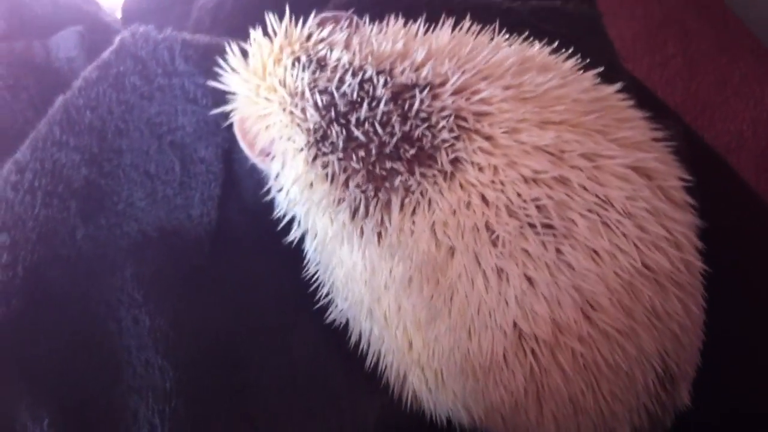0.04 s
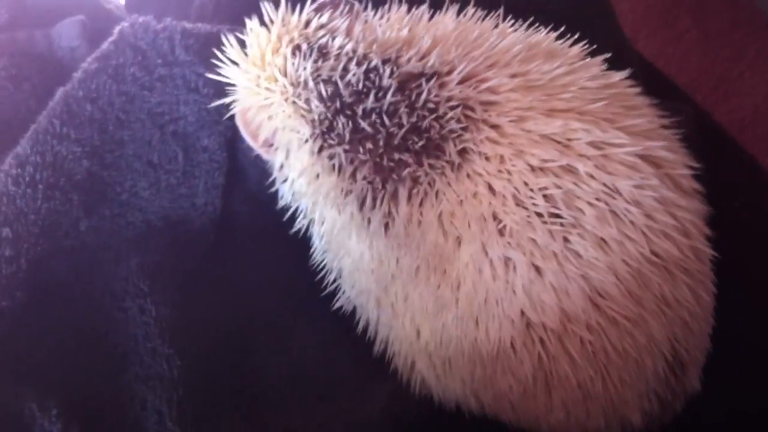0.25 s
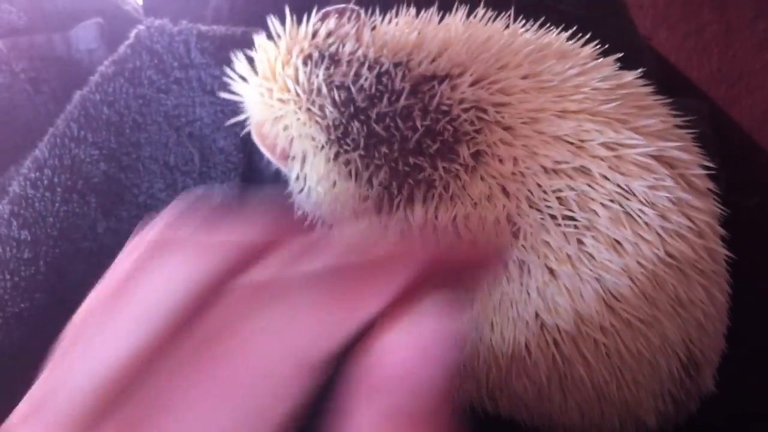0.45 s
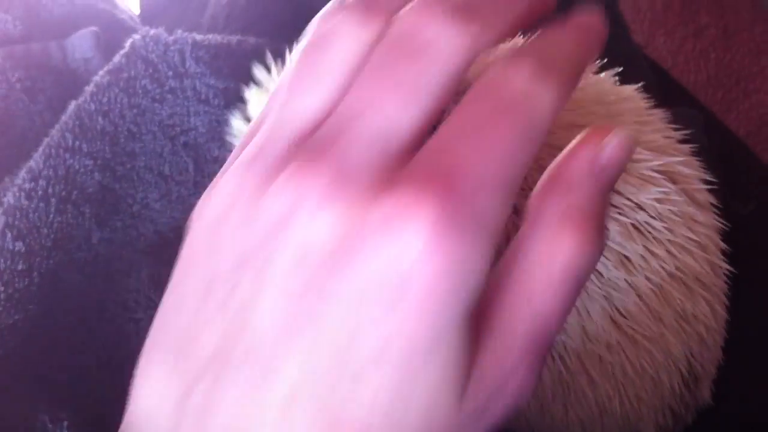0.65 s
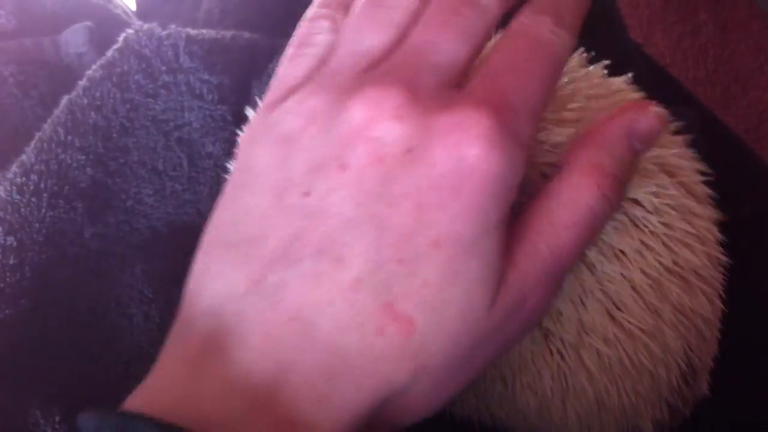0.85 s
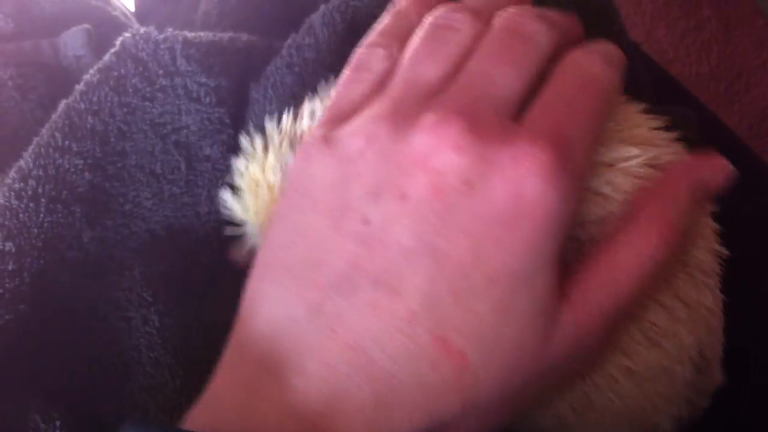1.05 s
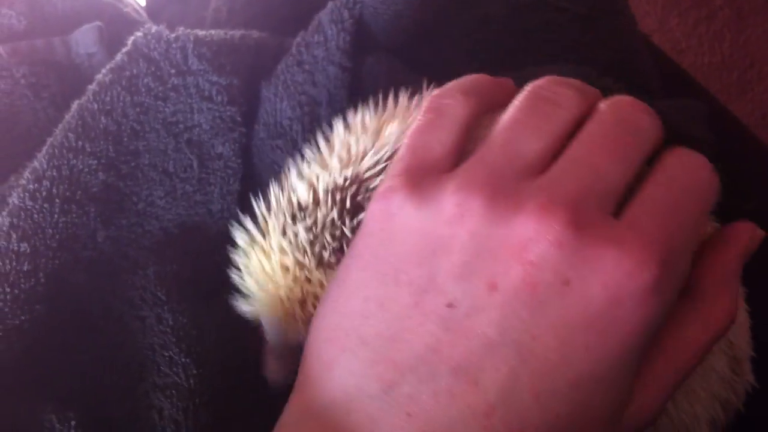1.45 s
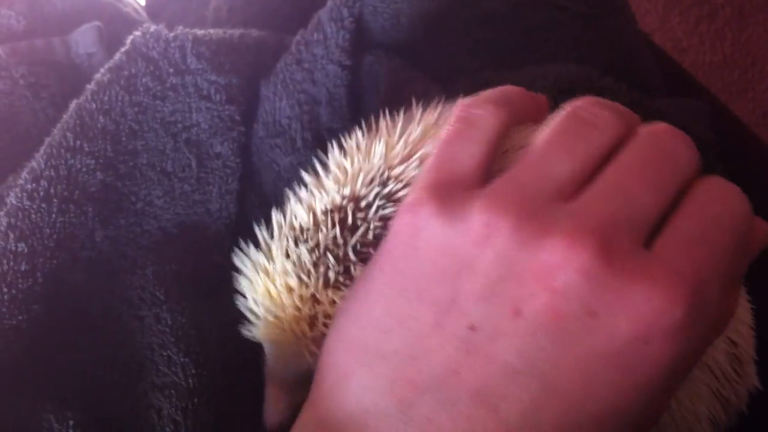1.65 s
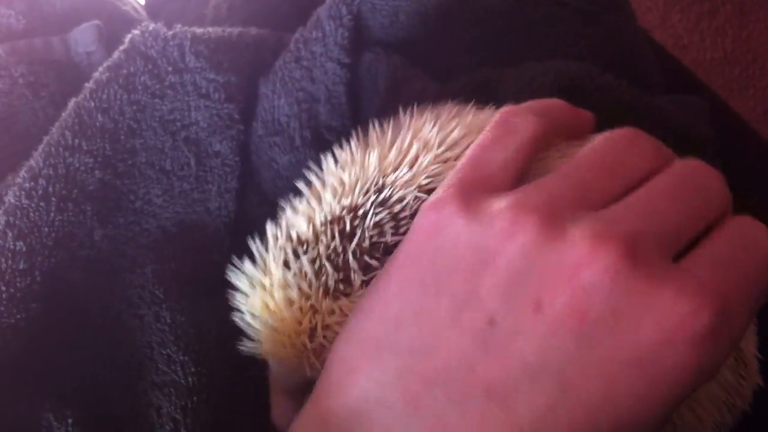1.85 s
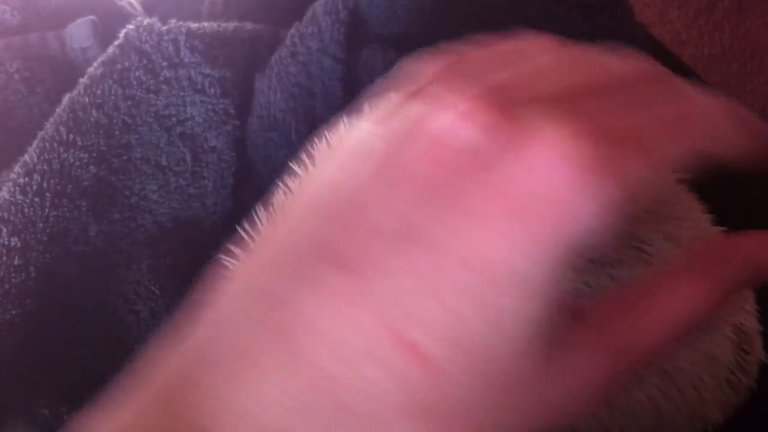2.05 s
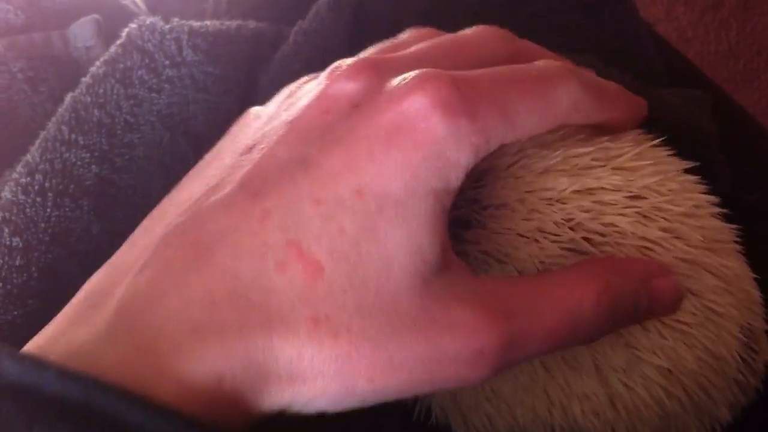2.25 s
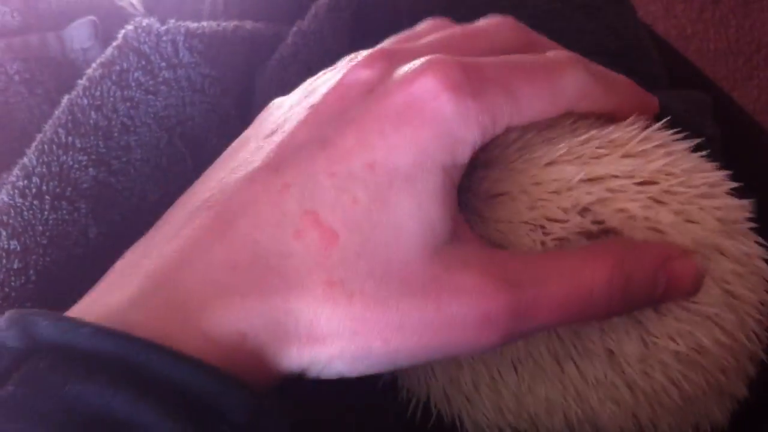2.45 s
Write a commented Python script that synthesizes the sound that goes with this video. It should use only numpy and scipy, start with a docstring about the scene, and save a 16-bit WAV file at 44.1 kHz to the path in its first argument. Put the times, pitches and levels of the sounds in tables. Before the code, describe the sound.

A hand softly strokes a hedgehog on a fleece blanket. First, light taps and a short scrape on the microphone end in one loud, dry knock at 0.25 seconds. Faint brushing over quills and cloth comes in strokes from 0.4 seconds on, with a faint, thin ring near 0.6. Between 1.1 and 2 seconds the hedgehog gives quick, very high sniffs, some whistling. Quiet room hiss and hum continue throughout.

```python
"""First come light taps and a short scrape as a grip slips on a hand-held microphone, then one dry knock.
After that a hand softly strokes a pet hedgehog on a fleece blanket: skin brushes over quills and cloth,
and a faint, thin tone rings briefly. The hedgehog sniffs in quick, very high puffs of air, some with
a thin nose whistle. Behind it all lie the hiss and low hum of a quiet room."""
import sys
import numpy as np
from scipy import signal
from scipy.fft import rfft, irfft
from scipy.io import wavfile
from scipy.ndimage import uniform_filter1d

SR = 44100
rng = np.random.default_rng(int(sys.argv[2]) if len(sys.argv) > 2 else 0)


def unload_audio(sound):
    """Save the sound as a 16-bit wav file, at the path given as the first command line argument."""
    columns = np.transpose(np.atleast_2d(sound))
    # keep every value between -1 and 1, then stretch to whole-number steps
    steps = np.round(np.clip(columns, -1, 1) * 32767)
    wavfile.write(sys.argv[1], SR, steps.astype(np.int16))


N = 110250

# Tone of the room air and microphone hiss: pitch_hz, gain_db
AIR_TONE = [(25, -12.5), (45, -20), (73, -18.5), (100, -9.5), (160, -1.5), (270, 0), (420, -5.5),
            (900, -10.5), (1500, -12), (2500, -14), (6000, -14.5), (9000, -15.5), (11800, -13),
            (15500, -14.5)]
# How the thin ring comes and goes: peak_s, rise_s, fall_s
RING_SWELL = (0.6, .09, 0.089)
# Loudness of the slipping grip: time_s, level_db
SLIP_LEVELS = [(.135, -74), (.172, -63), (.188, -55), (.196, -58.5), (0.208, -57), (0.221, -50),
               (.232, -58.5), (0.235, -35), (0.2457, -38), (0.246, -57), (.27, -63)]
# Tone of the slipping grip: pitch_hz, gain_db
SLIP_TONE = [(60, -32.5), (170, -10), (280, -11.5), (470, 4.5), (750, 2), (1500, 0), (2700, -10.5),
             (5000, -12.5), (9000, -8.5), (10300, -13.5), (12000, -9.5), (15500, -23)]
# Pitches at which the microphone's casing rings: pitch_hz, width_hz, gain_db
CASING_RINGS = [(212, 98, 13.5), (330, 140, 19), (523, 230, 15), (774, 224, 16), (1040, 380, 14.5),
                (1910, 570, 10), (2340, 590, 8), (2750, 500, 5.5), (3960, 360, -4.5), (5830, 1470, -2.5),
                (6750, 700, -8), (8950, 1270, 5), (9960, 1160, -2), (13500, 1000, -12)]
# Taps and knocks on the casing: start_s, push_db, crack_db, thump_hz, thump_db
CASING_KNOCKS = [(0.0272, -39.5, -59.5, 290, -53), (0.068, -61.5, -62, 500, -55),
                 (.1743, -45.5, -47, 720, -67), (.1857, -40, -51, 337, -50),
                 (.1893, -32.5, -31, 1020, -51.5), (0.2218, -33, -22, 540, -49),
                 (0.2371, -30.5, -23, 504, -38), (0.2455, -26, -23, 1505, -45), (0.2469, 0, -22, 334, -42)]
# Tone of a knock's crack: pitch_hz, gain_db
CRACK_TONE = [(300, -16), (3500, -2), (8000, -2), (12000, -1), (14000, -6), (15800, -10)]
# Strokes of the hand: peak_s, rise_s, fall_s, cloth_db, skin_db, tips_db, rasp_hz, rasp_db
HAND_STROKES = [(.445, 0.032, 0.044, -80, -75, -65, 1700, -92),
                (.495, 0.027, 0.03, -78, -72.5, -69, 1850, -70.5),
                (0.563, 0.058, 0.074, -63.5, -69, -69.5, 640, -82),
                (.588, 0.017, 0.016, -98, -85, -66.5, 9000, -66),
                (.72, 0.065, 0.085, -78, -75, -72.5, 8600, -75),
                (.803, 0.015, 0.038, -79, -72.5, -69, 5200, -71),
                (.845, 0.044, 0.048, -69.5, -72.5, -77, 2250, -71.5),
                (.94, 0.073, 0.08, -75, -81, -86, 1750, -85),
                (1.215, 0.039, 0.031, -73.5, -73, -75, 1200, -80),
                (1.275, 0.034, 0.048, -74, -79, -70, 3740, -78),
                (1.4, 0.036, 0.029, -76.5, -80, -84, 1510, -82),
                (1.84, 0.024, 0.043, -79, -72, -65, 3870, -71.5),
                (1.891, 0.048, 0.1, -67.5, -65, -84, 610, -75.5),
                (2.12, .08, 0.058, -76.5, -78, -75.5, 1200, -84),
                (2.5, 0.014, .03, -68, -73, -78, 830, -62.5)]
# Tone of the shifting blanket: pitch_hz, gain_db
CLOTH_TONE = [(45, -50), (80, -28), (130, -14), (220, -0.5), (320, 3.5), (480, -6), (700, -7.5),
              (1100, -18.5), (3000, -21), (15000, -48)]
# Tone of skin rubbing along quills: pitch_hz, gain_db
SKIN_TONE = [(50, -20), (200, -16), (700, -2), (1300, -3), (2000, -3), (3100, -7), (4000, -6.5), (6500, -8),
             (10000, -10.5), (15000, -32.5)]
# Tone of flicked quill tips: pitch_hz, gain_db
TIPS_TONE = [(1000, -9), (3500, -24), (5500, -2.5), (7000, -6.5), (9000, 1), (10500, -5), (12000, 3),
             (15500, -10.5)]
# The hedgehog's sniffs: peak_s, level_db
SNIFF_PUFFS = [(.096, -67), (1.148, -68.5), (1.26, -65), (1.357, -62), (1.564, -62.5), (1.661, -66),
               (1.767, -67), (1.877, -63), (1.99, -69.5)]
# Tone of air in its nostrils: pitch_hz, gain_db
NOSE_TONE = [(4000, -37), (8000, -9), (10300, -12), (11600, 3), (13300, -4), (14500, -7), (15800, -11)]
# Its nose whistles: start_s, length_s, from_hz, to_hz, level_db
NOSE_WHISTLES = [(0.081, 0.017, 11000, 12400, -66), (0.095, 0.019, 13750, 13200, -62.5),
                 (1.562, 0.0088, 12900, 14000, -61), (1.652, 0.011, 11700, 12300, -61.5),
                 (1.673, .009, 11700, 11100, -68.5), (1.756, .009, 11800, 12100, -63),
                 (1.757, .014, 14000, 13500, -66), (1.764, .009, 12700, 11600, -62),
                 (1.781, 0.0066, 11900, 11000, -64)]


def undb(db):
    """Turns decibels into a number to multiply by."""
    return 10 ** (np.asarray(db) / 20)


def unit(x):
    """Scales a sound to an average (rms) level of 1."""
    return x / np.sqrt(np.mean(x ** 2))


def times():
    """Time of each sample in seconds."""
    return np.arange(N) / SR


def freqs():
    """Pitches in Hz at which a filter's gains are given."""
    return np.maximum(np.arange(N + 1) * SR / (2 * N), 1)


def contour(tone):
    """Joins the points of a tone table into a gain for every pitch."""
    hz, db = np.array(tone).T
    return undb(np.interp(np.log(freqs()), np.log(hz), db))


def resonance(hz, width_hz):
    """Gains that let through only a band around one pitch."""
    return 1 / (1 + ((freqs() / hz - hz / freqs()) * hz / width_hz) ** 2)


def through(x, gain):
    """Filters a sound, turning each pitch up or down by its gain."""
    cepstrum = irfft(np.log(gain + 1e-7))
    # Folding this way makes the filter ring after a click, never before it.
    cepstrum[1:N] *= 2
    cepstrum[N + 1:] = 0
    return irfft(rfft(x, 2 * N) * np.exp(rfft(cepstrum)))[:N]


def coloured(x, tone):
    """Shapes a sound with a tone table, at an average level of 1."""
    return unit(through(x, contour(tone)))


def grains(per_s, scatter_db=3):
    """Rubbing as a crowd of tiny clicks of uneven size."""
    clicks = (rng.random(N) < per_s / SR) * rng.choice([-1, 1], N)
    return clicks * undb(scatter_db * np.minimum(rng.exponential(size=N), 4))


def wobble(samples):
    """A random wander; more samples make it slower."""
    return unit(uniform_filter1d(rng.standard_normal(N), size=samples))


def swell(peak_s, rise_s, fall_s):
    """A smooth rise and fall around one moment."""
    t = times() - peak_s
    return np.exp(-(t / np.where(t < 0, rise_s, fall_s)) ** 2)


def quiet_room(air_db=-66.5, hum_hz=121, hum_db=-82):
    """Steady room air and microphone hiss over a faint electrical hum."""
    air = coloured(rng.standard_normal(N), AIR_TONE)
    hum = np.sqrt(2) * np.sin(2 * np.pi * hum_hz * times())
    return undb(air_db) * air + undb(hum_db) * hum


def room_echo(x, level_db=-36, fade_s=0.14, dull_above_hz=1200):
    """A furnished room sends back a faint, dull, short echo."""
    tail = through(rng.standard_normal(N), 1 / np.hypot(1, freqs() / dull_above_hz))
    tail *= np.exp(-np.log(1000) * times() / fade_s)  # 60 dB down after fade_s
    tail /= np.sqrt(np.sum(tail ** 2))
    return undb(level_db) * signal.fftconvolve(x, tail)[:N]


def thin_ring(pitch_hz=5500, level_db=-73, waver_share=0.0042, flutter_db=3):
    """A faint, thin, wavering tone while the hand slides in."""
    wavering_hz = pitch_hz * (1 + waver_share * wobble(samples=700))
    level = undb(level_db + flutter_db * wobble(samples=700)) * swell(*RING_SWELL)
    return level * np.sin(2 * np.pi * np.cumsum(wavering_hz) / SR)


def slipping_grip():
    """Skin sticks and slips on the casing, hardest just before the loud knock."""
    time_s, level_db = np.array(SLIP_LEVELS).T
    level = undb(np.interp(times(), time_s, level_db, left=-np.inf, right=-np.inf))
    return level * coloured(grains(per_s=6000), SLIP_TONE)


def knocks(thump_rise_s=0.0016):
    """Each bump gives a crisp crack, a brief ring of the casing and a short, round thump."""
    pushes, cracks, thumps = np.zeros((3, N))
    for start_s, push_db, crack_db, thump_hz, thump_db in CASING_KNOCKS:
        pushes[int(start_s * SR)] += undb(push_db)
        cracks[int(start_s * SR)] += undb(crack_db)
        age_s = np.maximum(times() - start_s, 0)
        rise_and_fade = age_s / thump_rise_s * np.exp(1 - age_s / thump_rise_s)
        thumps += undb(thump_db) * rise_and_fade * np.cos(2 * np.pi * thump_hz * age_s)
    casing = np.sqrt(sum((undb(db) * resonance(hz, width)) ** 2 for hz, width, db in CASING_RINGS))
    return through(cracks, contour(CRACK_TONE)) + through(pushes, casing) + thumps


def stroking(clicks_per_s=7000, rasp_width_share=0.37):
    """Each stroke shifts the cloth, rubs the quills, flicks their tips and rasps at its own pitch."""
    cloth = coloured(rng.standard_normal(N), CLOTH_TONE)
    skin = coloured(grains(clicks_per_s), SKIN_TONE)
    tips = coloured(grains(clicks_per_s), TIPS_TONE)
    rub_spectrum = rfft(grains(clicks_per_s), 2 * N)
    out = np.zeros(N)
    for peak_s, rise_s, fall_s, cloth_db, skin_db, tips_db, rasp_hz, rasp_db in HAND_STROKES:
        rasp_band = resonance(rasp_hz, rasp_width_share * rasp_hz)
        rasp = unit(irfft(rub_spectrum * rasp_band)[:N])
        mix = undb(cloth_db) * cloth + undb(skin_db) * skin + undb(tips_db) * tips + undb(rasp_db) * rasp
        out += swell(peak_s, rise_s, fall_s) * mix
    return out


def sniffing():
    """The hedgehog puffs air through its tiny nostrils."""
    puffs = sum(undb(db) * swell(peak_s, rise_s=0.014, fall_s=0.025) for peak_s, db in SNIFF_PUFFS)
    return puffs * coloured(rng.standard_normal(N), NOSE_TONE)


def nose_whistles(waver_share=0.0081):
    """Air in the nostrils sometimes breaks into a tiny whistle that slides up or down."""
    waver = 1 + waver_share * wobble(samples=40)
    out = np.zeros(N)
    for start_s, length_s, from_hz, to_hz, level_db in NOSE_WHISTLES:
        progress = np.clip((times() - start_s) / length_s, 0, 1)
        pitch_hz = (from_hz + (to_hz - from_hz) * progress) * waver
        rise_and_fade = np.sqrt(2 * np.abs(np.sin(np.pi * progress)))
        out += undb(level_db) * rise_and_fade * np.sin(2 * np.pi * np.cumsum(pitch_hz) / SR)
    return out


def scene(low_cut_hz=154):
    """Adds the grip noises, with their bass thinned, to the hand, the hedgehog and the room."""
    bass_cut = signal.butter(2, low_cut_hz, "high", fs=SR, output="sos")
    grip = signal.sosfilt(bass_cut, knocks() + slipping_grip())
    mix = grip + room_echo(grip) + stroking() + thin_ring() + sniffing() + nose_whistles() + quiet_room()
    return mix[None]


def record(dry):
    """Cuts away the very highest treble."""
    top_hz = 15700
    return signal.sosfilt(signal.ellip(10, .2, 70, top_hz, fs=SR, output="sos"), dry)


dry = scene()
out = record(dry)
unload_audio(out)
```